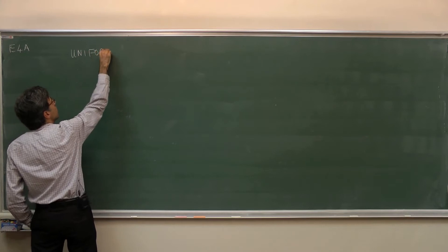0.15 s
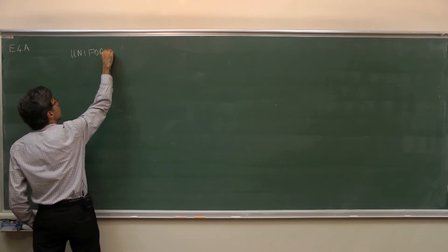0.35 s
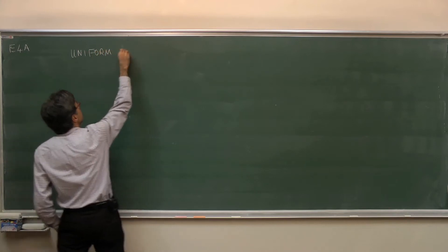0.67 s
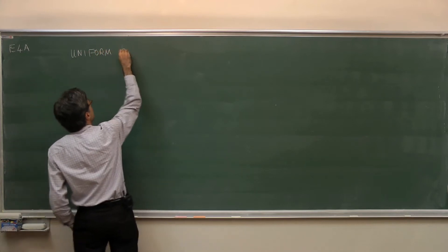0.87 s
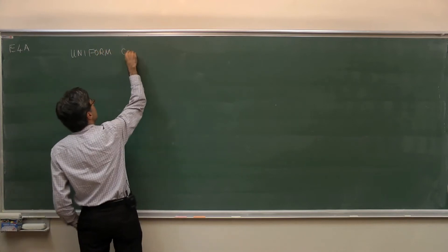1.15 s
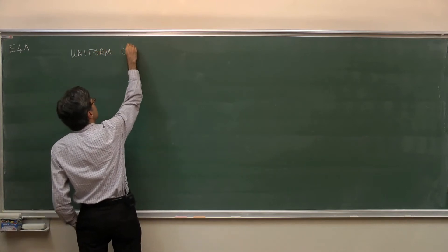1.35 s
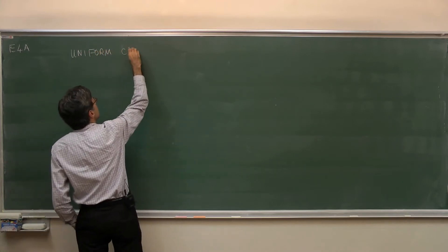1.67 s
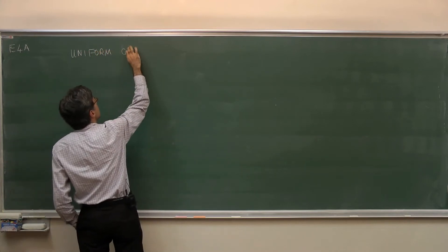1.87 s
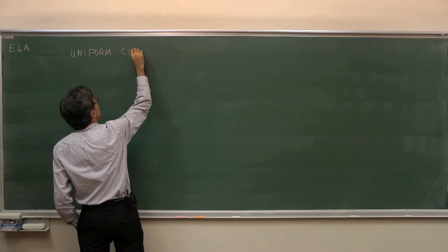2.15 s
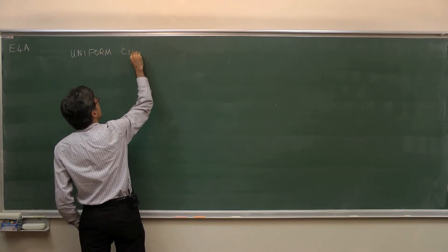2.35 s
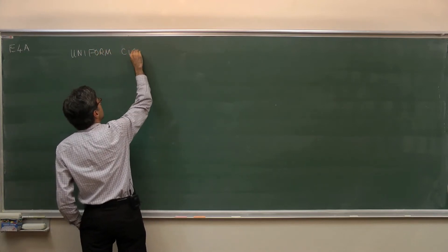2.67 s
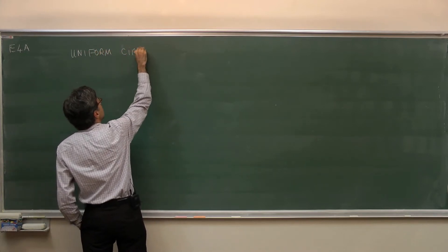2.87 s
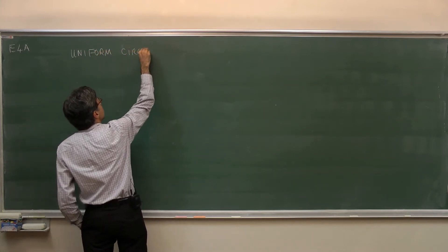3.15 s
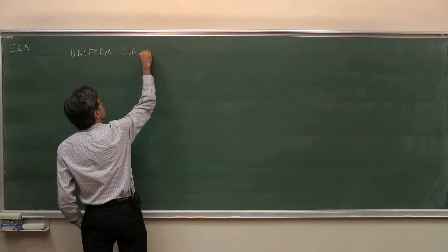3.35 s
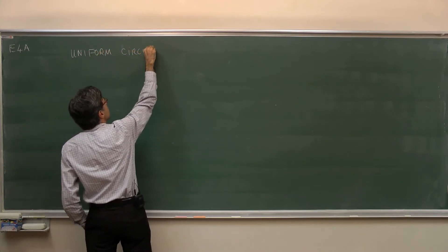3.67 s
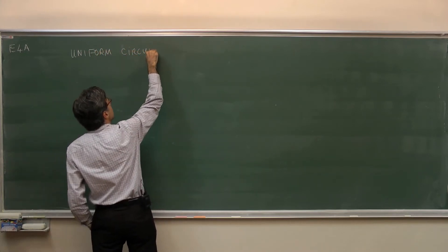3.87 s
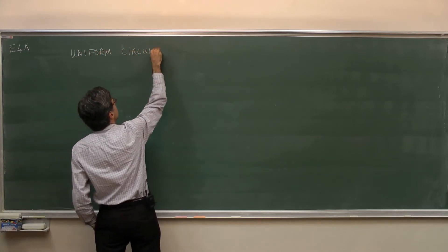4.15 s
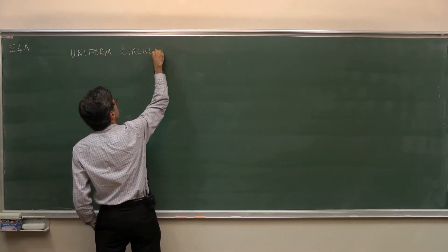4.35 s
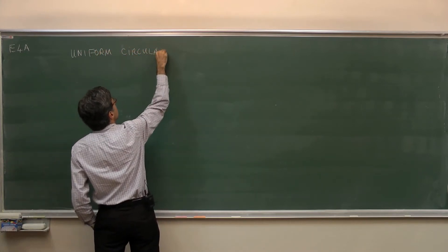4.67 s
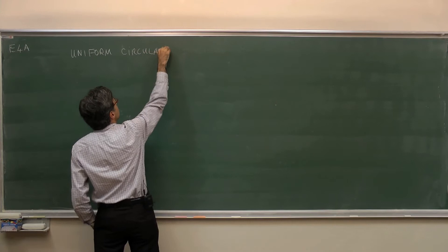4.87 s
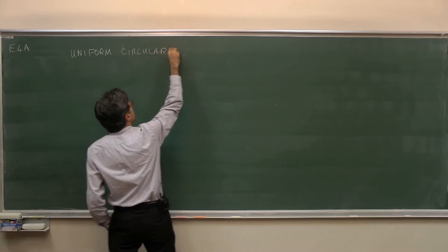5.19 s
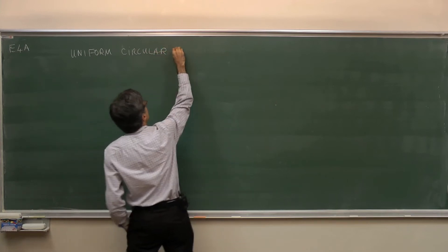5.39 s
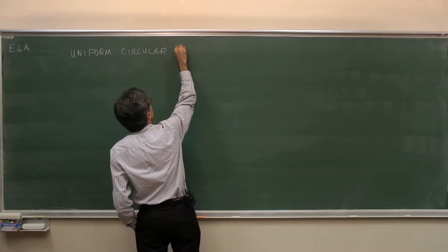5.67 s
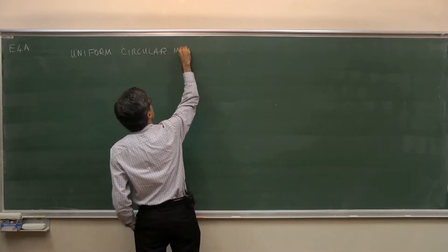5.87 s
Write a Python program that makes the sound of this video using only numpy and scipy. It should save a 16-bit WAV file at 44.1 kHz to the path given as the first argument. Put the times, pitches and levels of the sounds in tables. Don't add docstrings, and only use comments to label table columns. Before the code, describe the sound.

Sharp hollow chalk taps, each followed by brief dry hissing scratches, ring off a big board in a still lecture room over soft air hum.

```python
import sys
import numpy as np
from scipy import signal
from scipy.fft import rfft, irfft, next_fast_len
from scipy.io import wavfile
from scipy.ndimage import uniform_filter1d

SR = 44100
rng = np.random.default_rng(int(sys.argv[2]) if len(sys.argv) > 2 else 0)


def pcm_store(signal):
    levels = np.round(np.clip(np.atleast_2d(signal), -1, 1) * 32767)
    wavfile.write(sys.argv[1], SR, levels.astype(np.int16).T)


def how_loud(loudness_db):
    steps = np.asarray(loudness_db, float) / 20
    return 10 ** steps


N = 265482

# [t/s, peak level/dB, knock centre f/Hz, thump level/dB, crack level/dB]
TAPS = [(0.095, -9, 1530, -10, -33.5), (0.8055, -7.5, 1870, -17, -40.5), (1.1178, -3.5, 2010, -12.5, -32.5),
        (1.3946, -5.5, 1717, -20.5, -30.5), (2.3043, -8, 1643, -26, -31), (2.9223, -5.5, 1750, -26, -22.5),
        (3.298, -5, 1490, -27.5, -22.5), (3.723, -5, 1750, -24.5, -15), (4.0497, -5.5, 1870, -23.5, -22.5),
        (4.2591, -3.5, 1940, -26.5, -22), (4.4755, -4.5, 1620, -18, -22), (4.6585, -4, 1850, -21.5, -8.5),
        (5.3678, -6.5, 1480, -26.5, -23.5), (5.9486, -7.5, 2010, -20, -22.5)]


def rms_one(x):
    return x / np.sqrt(np.mean(x ** 2) + 1e-20)


def at_hz(points, hz):
    table_hz, values = np.transpose(points)
    return np.interp(np.log(hz + 1), np.log(table_hz), values)


def bell(hz, centre_hz, width_hz):
    return 1 / np.sqrt(1 + (2 * (hz - centre_hz) / width_hz) ** 2)


def coloured(gain):
    size = next_fast_len(N)
    spectrum = rfft(rng.standard_normal(size)) * gain(np.fft.rfftfreq(size, 1 / SR))
    return rms_one(irfft(spectrum, size)[:N])


def drift(rate):
    r = np.exp(-32 * np.pi * rate / SR)
    white = rng.standard_normal(N // 16 + 3002)
    slow = signal.lfilter([1], [1, -2 * r, r * r], white)[3000:]
    return np.interp(np.arange(N) / 16, np.arange(len(slow)), rms_one(slow))


def patchy(gain, patchy_db, low_hz, high_hz, rate, count):
    out, width = 0, np.log(high_hz / low_hz) / (count - 1)
    for hz in np.geomspace(low_hz, high_hz, num=count):
        part = lambda f: gain(f) * np.exp(-(np.log((f + 1) / hz) / width) ** 2)
        weight = np.linalg.norm(part(np.linspace(0, SR / 2, num=999)))
        out = out + weight * how_loud(patchy_db * drift(rate)) * coloured(part)
    return rms_one(out)


def ring(clicks, hz, t60):
    r, w = how_loud(-60 / (t60 * SR)), 2 * np.pi * hz / SR
    return signal.lfilter([0, np.sin(w)], [1, -2 * r * np.cos(w), r * r], clicks + 1e-18)


def add(out, s, sound):
    i = round(s * SR)
    out[i:i + len(sound)] += sound[:N - i]


def ventilation():
    # [f/Hz, density level/dB]
    air_colour = [(20, -26), (45, -2.5), (90, 2), (250, -5.5), (400, -12.5), (800, -15.5), (1200, -20),
                  (2000, -24.5), (4000, -31), (8000, -32.5), (15500, -34.5), (17000, -52)]
    air = coloured(lambda hz: how_loud(at_hz(air_colour, hz)))
    return how_loud(-64 + 0.76 * drift(18.0)) * air


def room():
    # [t/s, level/dB]
    surfaces = [
        (.0135, -26),
        (.025, -19),
        (.092, -33),
    ]
    # [f/Hz, t60/s]
    tail_t60 = [(60, 0.42), (250, 0.84), (600, 0.35), (1500, 0.5), (3000, 0.53), (6000, 0.5), (14000, .2)]
    # [f/Hz, level/dB]
    tail_db = [(60, -13.5), (250, -10), (700, 1), (2000, -9.5), (5000, -11), (14000, -13)]
    early_db, early_t60_s = -3.5, 0.13
    t = np.arange(SR * 3 // 5) / SR
    answer = np.zeros(len(t))
    edges = 40 * 2 ** np.arange(0, 9, .5)
    white = rng.standard_normal((2, len(t)))
    for k, (low, high) in enumerate(zip(edges, edges[1:])):
        hz = np.sqrt(low * high)
        late = how_loud(-60 * t / at_hz(tail_t60, hz))
        early = how_loud(early_db + 5.5 - 60 * t / early_t60_s)
        dying = white[k % 2] * (late + early) * np.clip(t / 0.013, 0, 1)
        dying /= np.sqrt(np.sum(dying ** 2))
        band = signal.butter(2, [low, high], "band", fs=SR, output="sos")
        answer += how_loud(at_hz(tail_db, hz)) * signal.sosfilt(band, dying)
    for s, db in surfaces:
        facets = (rng.random(130) < .06) * rng.choice([-1, 1], 130)
        add(answer, s, how_loud(db) * facets * np.exp(-np.arange(130) / 50))
    answer[0] = 1
    return answer


def small_contacts():
    # [t/s, peak level/dB]
    catches = [(0.392, -54), (0.541, -44), (1.757, -58), (1.84, -58.5), (2.4614, -63), (3.5086, -58),
               (3.5883, -50), (3.6496, -49), (4.184, -45.5), (4.41, -56), (4.588, -46.5), (4.799, -55),
               (4.886, -46), (4.9911, -50), (5.126, -40), (5.652, -55), (5.8651, -49)]
    # [t/s, peak level/dB, f/Hz]
    knuckles = [(0.31, -43, 246), (.344, -48, 256), (.405, -45, 257), (.49, -58, 597), (.563, -42, 569),
                (.575, -40, 247), (3.62, -60, 300), (5.068, -56, 479), (5.099, -57, 260), (5.161, -42, 497),
                (5.164, -43, 232), (5.799, -45, 351)]
    out, t = np.zeros(N), np.arange(1800) / SR
    bright = signal.butter(2, [1400, 10000], "band", fs=SR, output="sos")
    for (s, db), grit in zip(catches, rng.standard_normal((len(catches), len(t)))):
        add(out, s, how_loud(db + 3.0) * signal.sosfilt(bright, grit * np.exp(-t / 0.0009)))
    for (s, db, hz), grit in zip(knuckles, rng.standard_normal((len(knuckles), len(t)))):
        dull = signal.butter(1, [.5 * hz, 1.5 * hz], "band", fs=SR, output="sos")
        push = np.sin(2 * np.pi * hz * t) * t / .004 * np.exp(1 - t / .004)
        add(out, s, how_loud(db + 9) * signal.sosfilt(dull, grit * np.exp(-t / .009)))
        add(out, s, how_loud(db - 2) * push)
    return out


def grinds():
    # [start t/s, length/ms, level/dB, first f/Hz, last f/Hz]
    hoarse = [(0.16, 89, -48.5, 2276, 3190), (0.386, 89, -49, 2537, 2670), (0.41, 41, -55, 1313, 1197),
              (1.96, 74, -73, 3110, 3200), (1.961, 61, -67.5, 1750, 1710), (2.46, 81, -57, 2200, 2093),
              (2.665, 44, -57, 3500, 3200), (2.73, 130, -79, 2100, 1666), (3.442, 90, -56, 2300, 3310),
              (3.57, 44, -72, 4100, 3900), (4.801, 73, -54.5, 2816, 3730), (4.98, 79, -50, 2530, 3190),
              (4.981, 49, -54.5, 1477, 1795), (4.974, 22, -57, 4190, 3900),
              (5.103, 53.5, -56.5, 2700, 2390), (5.111, 48, -55.5, 1504, 1602),
              (5.129, 27, -60.5, 4070, 3900), (5.5, 82, -53, 2590, 2680), (5.658, 72, -57, 3700, 4300),
              (5.66, 79, -57, 1610, 2233)]
    width_hz = 710
    narrow = signal.butter(2, width_hz / 2, fs=SR, output="sos")
    out = np.zeros(N)
    for start, length_ms, db, first_hz, last_hz in hoarse:
        share = np.linspace(0, 1, round(length_ms * SR / 1000))
        noise = rng.standard_normal((2, 6000))[:, :len(share)]
        slow = signal.sosfilt(narrow, noise)
        sweep = np.exp(2j * np.pi * np.cumsum(first_hz + (last_hz - first_hz) * share) / SR)
        song = rms_one(((slow[0] + 1j * slow[1]) * sweep).real)
        add(out, start, how_loud(db) * np.sin(np.pi * share) ** 0.56 * song)
    return out


def moves():
    # [start t/s, length/ms, share spent speeding up/0-1, hiss level/dB]
    lines = [(0.152, 107, 0.3, -60.5), (0.275, 95, 0.73, -65.5), (0.387, 80, 0.4, -57),
             (0.488, 119, .63, -61), (0.818, 163, .7, -58.5), (0.939, 113, 0.46, -61), (1.0, 82, 0, -75),
             (1.137, 93, 0.36, -60), (2.327, 102, 0.5, -58), (2.458, 92, 0.88, -54.5),
             (2.546, 91, 1, -62.5), (2.723, 105, 0.53, -60), (2.955, 99, 0.8, -59), (3.324, 95, .4, -61.5),
             (3.428, 92, 0.78, -61.5), (3.544, 89, 0.64, -64), (3.741, 113, .44, -63.5),
             (3.861, 80, 1, -62), (4.066, 98, 0, -57), (4.275, 118, 0.6, -62), (4.489, 93, 0.9, -59.5),
             (4.673, 96, 0.05, -55.5), (4.793, 79, 0.3, -60), (4.85, 135, 0.24, -59),
             (4.97, 82, 0.6, -63.5), (5.079, 73, .88, -60.5), (5.398, 120, .59, -56),
             (5.533, 106, 0.34, -57), (5.647, 78, 0.67, -56.5), (5.753, 101, 0.26, -58)]
    # [start t/s, length/ms, hiss level/dB]
    quick = [(0, 21, -65.5), (1.432, 39, -67), (2.666, 24.5, -61), (3.09, 50, -61.5), (3.635, 34, -66.5),
             (4.176, 24, -64), (4.34, 49, -61), (4.405, 18, -69), (5.51, 26, -68), (5.859, 25, -62),
             (5.966, 53, -55)]
    # [start t/s, length/ms, hiss level/dB, board rub level/dB]
    sleeve = [
        (0.71, 110, -67, -61.5),
        (1.7, 138, -79.5, -84),
        (1.9, 155, -71.5, -71.5),
        (2.169, 99, -82, -77),
        (5.18, 290, -84, -68.5),
    ]
    flick_share, brush_share = 0.8, 0.93
    fall_db, flick_fall_db, brush_fall_db = -10, -3.5, -8.5
    edge_s, brush_edge_s = .006, .06
    rub = lambda db: -57.5 + .3 * (db + 59.5)
    rows = [(s, ms, share, db, fall_db, rub(db), edge_s) for s, ms, share, db in lines]
    rows += [(s, ms, flick_share, db, flick_fall_db, rub(db), edge_s) for s, ms, db in quick]
    rows += [(s, ms, brush_share, db, brush_fall_db, rub_db, brush_edge_s) for s, ms, db, rub_db in sleeve]
    return [(s, s + np.clip(share, .05, .95) * ms / 1000, s + ms / 1000, *rest)
            for s, ms, share, *rest in rows]


def off_edge(x):
    echo_s, sway, echo_db = .00065, .12, -5.0
    lag = echo_s * SR * (1 + sway * drift(3))
    return rms_one(x + how_loud(echo_db) * np.interp(np.arange(N) - lag, np.arange(N), x))


def strokes(onset_db=-10.0, grain_db=1.1):
    # [f/Hz, density level/dB]
    grain_colour = [(240, -30), (400, -5), (777, -6.5), (1070, -11.5), (1650, -4), (2670, -5.5),
                    (4730, -11), (6050, -8.5), (7630, -9), (8370, -6.5), (10900, -16.5), (14600, -12.5),
                    (16000, -13)]
    # [f/Hz, width/Hz, lift/dB]
    stick = [(3900, 290, 6), (5380, 290, 5.5), (5740, 350, 1.5), (8560, 450, 1), (9570, 170, 4.5),
             (14700, 1800, 3)]
    # [f/Hz, density level/dB]
    shake_colour = [(40, -20), (85, 3.5), (140, -4), (225, -7.5), (262, 4.5), (300, -0.5), (350, -2),
                    (600, -20.5), (1200, -32)]
    stop_edge_s = .006
    shudder_follows = 0.49
    t, hiss, body = np.arange(0, N + 32, 32) / SR, 0, 0
    for start, fastest, stop, db, fall_db, rub_db, edge_s in moves():
        rise = np.clip((fastest - t) / (fastest - start), 0, 1)
        fall = np.clip((t - fastest) / (stop - fastest), 0, 1)
        touching = np.clip(np.minimum((t - start) / edge_s, (stop - t) / stop_edge_s) + .5, 0, 1)
        speed = how_loud(onset_db * rise ** 2 + fall_db * fall ** 2) * touching
        hiss = np.hypot(hiss, speed * how_loud(db))
        body = np.hypot(body, speed * how_loud(rub_db))
    hiss, body = [np.interp(np.arange(N) / SR, t, level) for level in (hiss, body)]

    loose_db = shudder_follows * np.interp(np.arange(N) / SR, *np.transpose(TAPS)[[0, 3]])
    shaking = how_loud(10.5 + loose_db + 3.8 * drift(3.0)) * uniform_filter1d(body, size=1300)
    shudder = shaking * coloured(lambda hz: how_loud(at_hz(shake_colour, hz)))

    colour = lambda hz: how_loud(at_hz(grain_colour, hz) + sum(db * bell(hz, f, w) ** 2 for f, w, db in stick))
    high = lambda hz: 1 / np.sqrt(1 + (4600 / (hz + 1)) ** 8)
    bright = patchy(lambda hz: colour(hz) * high(hz),
                    patchy_db=2.4, low_hz=3500, high_hz=15500, rate=9, count=13)
    dull = patchy(lambda hz: colour(hz) * np.sqrt(1 - high(hz) ** 2),
                  patchy_db=3.2, low_hz=350, high_hz=5500, rate=16, count=9)
    grains = how_loud(grain_db * drift(300))
    return grains * (how_loud(0.5) * hiss * off_edge(bright) + how_loud(2.5) * body * dull) + shudder


def knock(centre_hz, thump_db, crack_db, boom_db, luck, edge_s=0.0018, edge_db=-16.5,
          scatter_db=-11.0, scatter_t60=0.17):
    # [f/Hz, density level/dB]
    blow_colour = [(30, -6), (120, -4), (260, -2.5), (560, -8.5), (780, -7), (1000, -9.5), (1400, -4.5),
                   (2000, -3.5), (3000, -5), (4400, -13.5), (5400, -15.5), (7000, -25), (9000, -26.5),
                   (16000, -44)]
    bend_s = .085
    hz = np.fft.rfftfreq(4096, 1 / SR)
    low, deep = bell(hz, 0, 670) ** 4, bell(hz, 0, 450) ** 4
    level_db = at_hz(blow_colour, hz) + boom_db * deep + thump_db * (low - deep)
    level_db = level_db + crack_db * (1 - bell(hz, 0, 13000) ** 2)

    grit = (luck[2] - .5) * np.exp(-np.arange(70) / 30)
    grit_s = np.cumsum(luck[0]) * 8e-5
    crumble = (grit[:, None] * np.exp(-2j * np.pi * hz * grit_s[:, None])).sum(axis=0) / np.linalg.norm(grit)
    solid = 1 / (1 + (hz / 4300) ** 8)
    colour = how_loud(level_db) * (0.79 + bell(hz, centre_hz, 310)) * (solid + (1 - solid) * crumble)

    late = np.concatenate([[0, edge_s], .0015 + .03 * luck[0] ** 1.5])
    scatter = how_loud(scatter_db - 60 * late[2:] / scatter_t60) * np.sign(luck[1] - .5)
    gains = np.concatenate([[1, how_loud(edge_db)], scatter])
    late = late[:, None]
    gains = gains[:, None] * np.exp(-late * hz * 0.048)
    bend = bend_s * (np.minimum(np.sqrt(hz + 60), 110) - hz / 220 * (hz < 12040) - 55 * (hz >= 12040))
    paths = colour * gains * np.exp(-2j * np.pi * (late * hz + 2 * bend * (1 + 30 * late)))
    direct = irfft(paths[0])[:3072]
    returns = irfft(paths[1:].sum(axis=0) * (1 - bell(hz, 0, 500) ** 2))[:3072]
    return np.array([direct, returns]) / np.abs(direct).max()


def taps():
    # [f/Hz, level/dB, t60/s]
    panel = [(82, -37, .22), (143, -38, .2), (204, -39, .2), (236, -38, .2), (258, -33, .25),
             (272, -34, .22), (349, -35, .18), (392, -37, .15), (785, -41, .07)]
    usual_boom_db, soft_below_db, boom_loss = -27, -28, 1.2
    out, mean = np.zeros(N), np.mean(TAPS, axis=0)
    luck, strengths = rng.random((len(TAPS), 3, 70)), rng.standard_normal((len(TAPS), len(panel)))
    click = np.eye(1, SR // 2, k=130)[0]
    for (s, db, hz, thump_db, crack_db), mine, strength in zip(TAPS, luck, strengths):
        boom_db = usual_boom_db - boom_loss * max(soft_below_db - crack_db, 0)
        direct, returns = how_loud(-3.0) * knock(hz, thump_db - mean[3], crack_db - mean[4],
                                            boom_db - usual_boom_db + 7.5, mine)
        sound = np.zeros(len(click))
        for (f, level_db, t60), chance in zip(panel, strength):
            booms = f < 160 or 300 < f < 400
            drive_db = boom_db + 11.5 if booms else thump_db
            sound += how_loud(drive_db + 18.5 + level_db + 4.2 * chance) * ring(click, f, t60)
        add(sound, 0, direct)
        add(out, s - .0003, how_loud(db) * signal.fftconvolve(sound, room()))
        add(out, s - .0003, how_loud(db) * returns)
    return out


def scene():
    rubs, contacts = strokes() + grinds(), small_contacts()
    sent = rubs + how_loud(-2.5) * contacts
    tail = signal.fftconvolve(sent, room())[:N] - sent
    quiet = rubs + contacts + how_loud(-2.5) * tail + ventilation()
    faint_top = signal.cheby2(12, 40, 15950, fs=SR, output="sos")
    mono = taps() + signal.sosfilt(faint_top, quiet)
    treble = signal.butter(4, 7000, "high", fs=SR, output="sos")
    trace = how_loud(-18) * signal.sosfilt(treble, np.roll(mono, 37))
    return np.array([mono + trace, mono - trace])


def top_cut(x):
    return signal.sosfilt(signal.butter(12, 16860, fs=SR, output="sos"), x)


def record(dry):
    open_before, open_after = np.ones(N), np.ones(N)
    for s, *_ in TAPS:
        open_before[round((s - .014) * SR):round((s - .002) * SR)] = 0
        open_after[round((s + .009) * SR):round((s + .044) * SR)] = 0
    for keep, edge_hz in ((open_before, 1400), (open_after, 10000)):
        highs = signal.sosfiltfilt(signal.butter(4, edge_hz, "high", fs=SR, output="sos"), dry)
        dry = dry - .9 * (1 - uniform_filter1d(keep, size=90)) * highs
    mix = signal.sosfilt(signal.cheby2(10, 50, 16700, fs=SR, output="sos"), dry)
    return top_cut(mix)


dry = scene()
out = record(dry)
pcm_store(out)
```